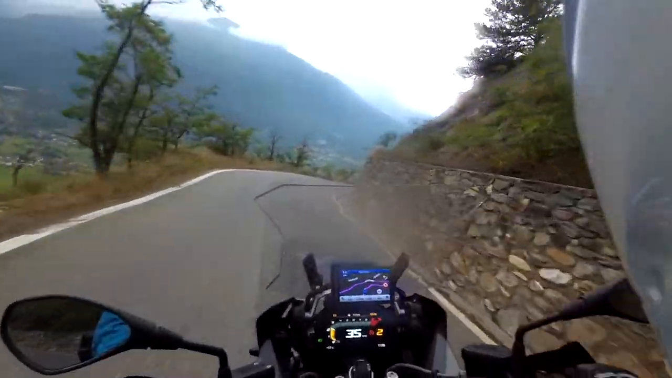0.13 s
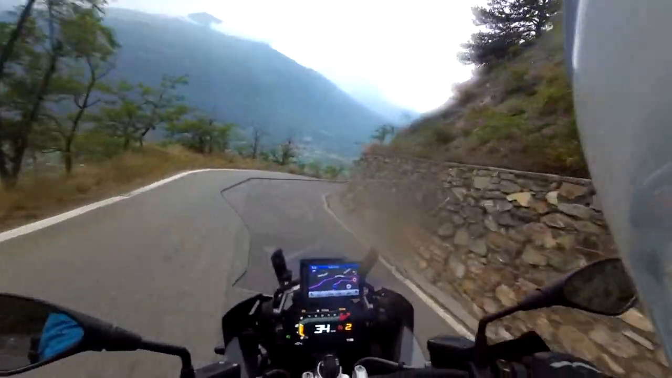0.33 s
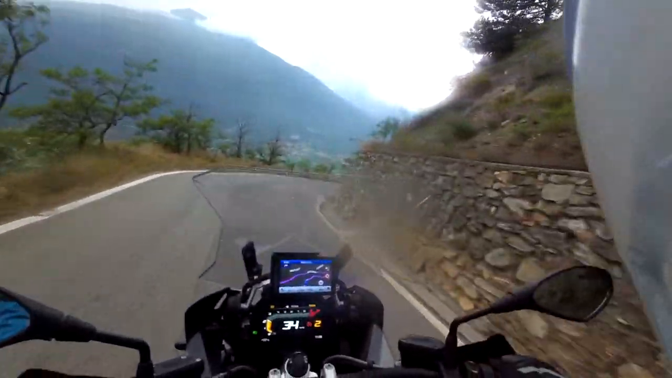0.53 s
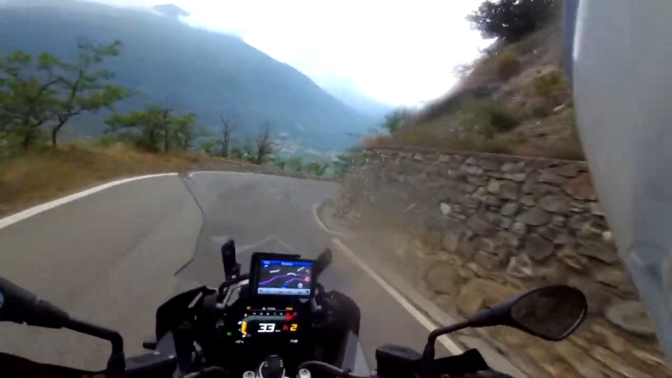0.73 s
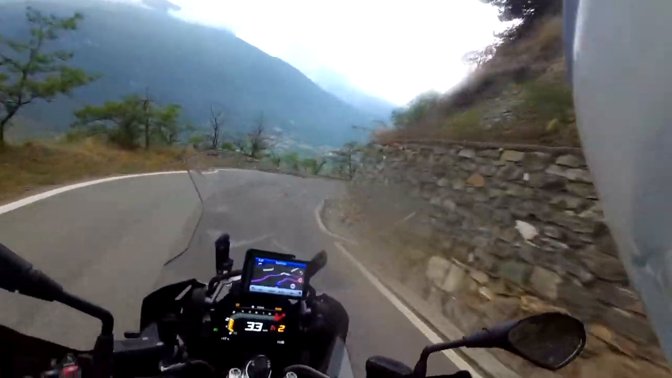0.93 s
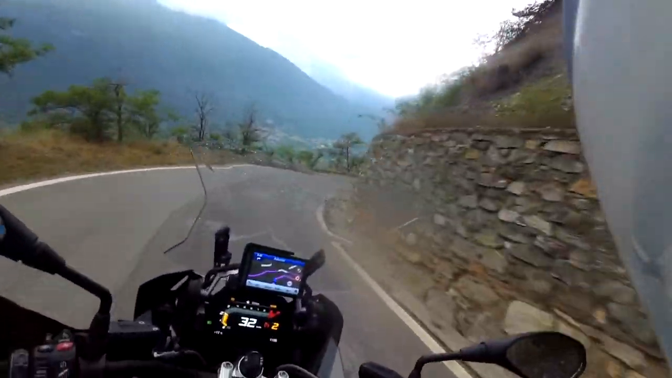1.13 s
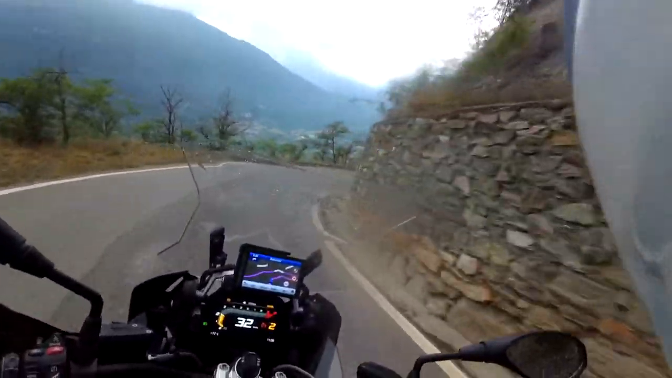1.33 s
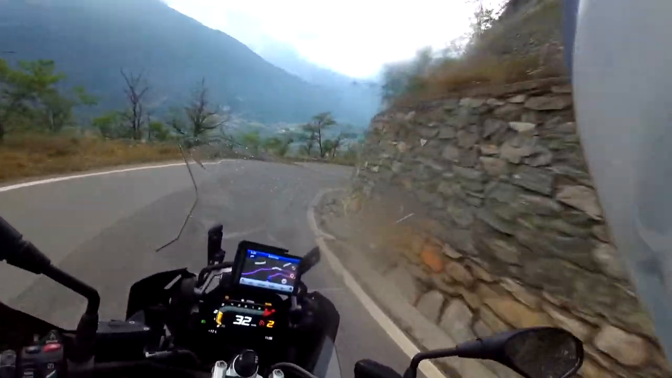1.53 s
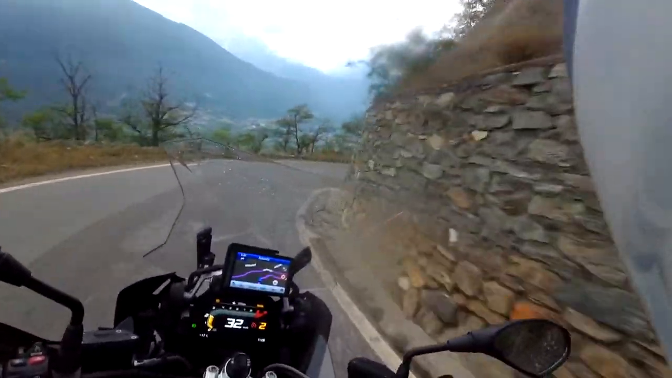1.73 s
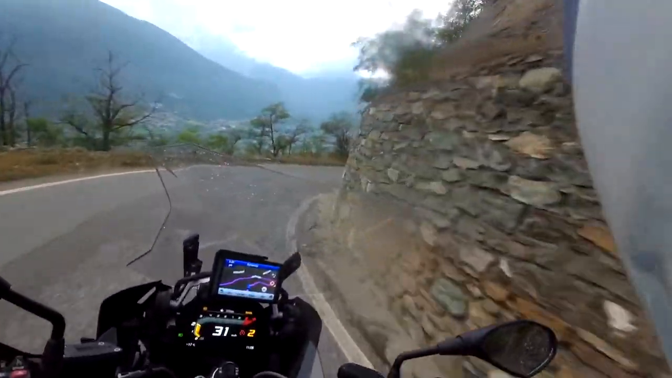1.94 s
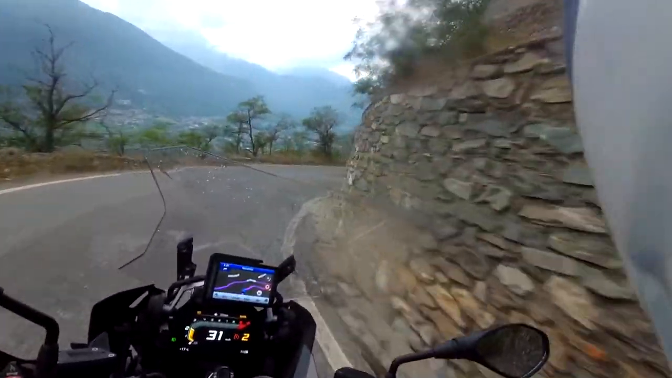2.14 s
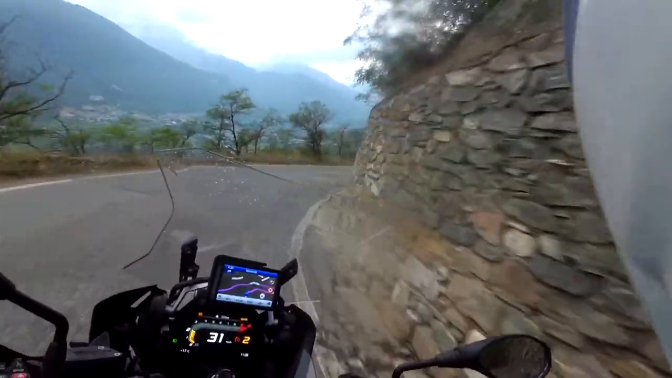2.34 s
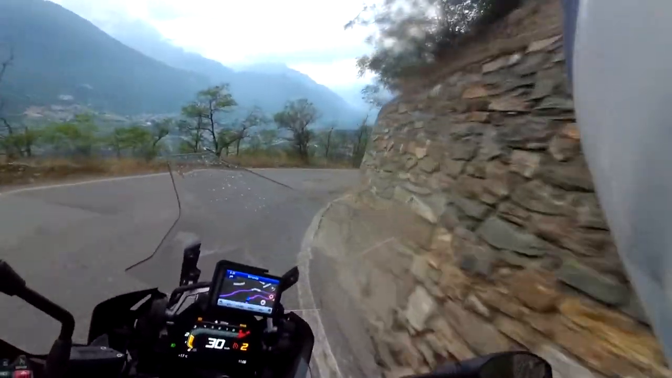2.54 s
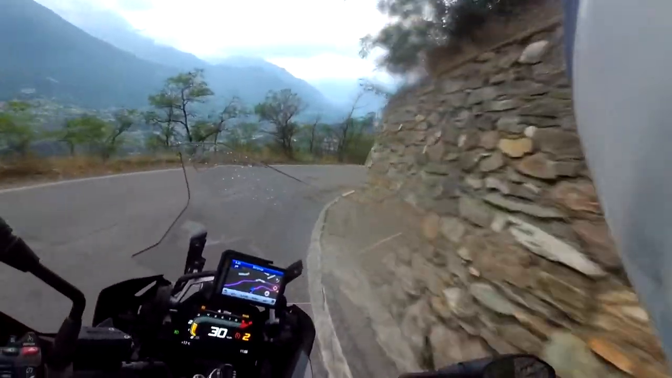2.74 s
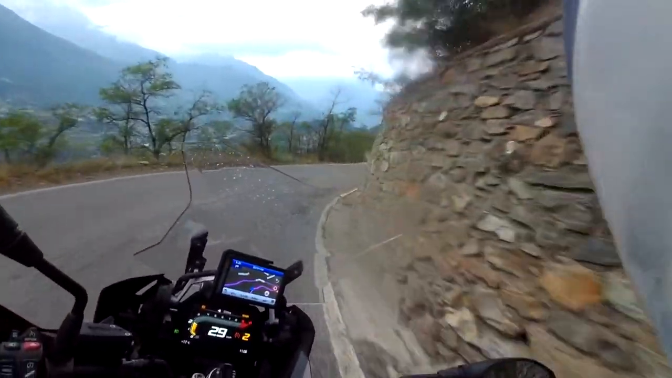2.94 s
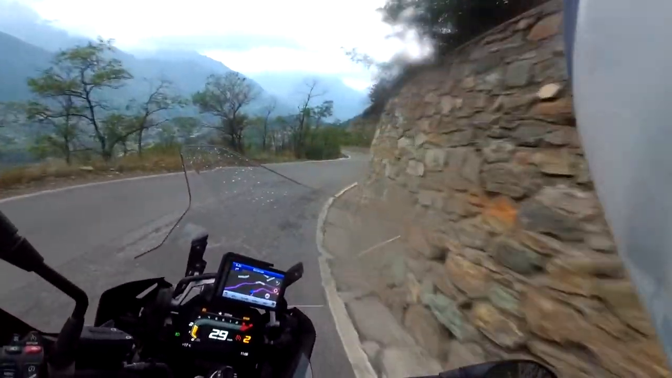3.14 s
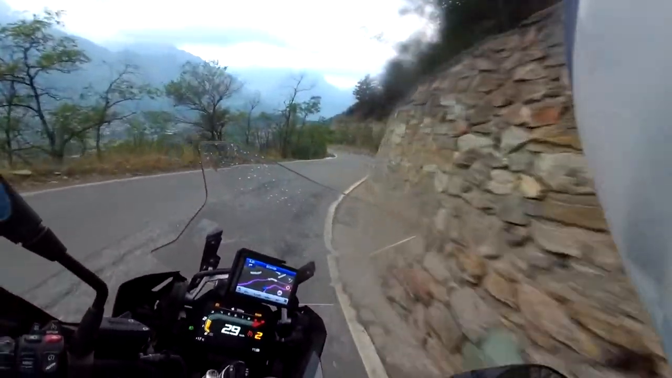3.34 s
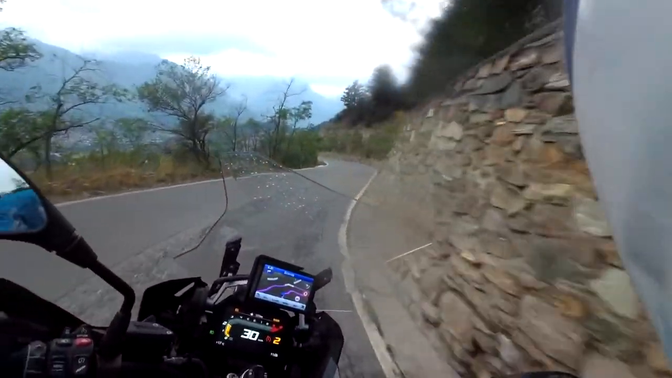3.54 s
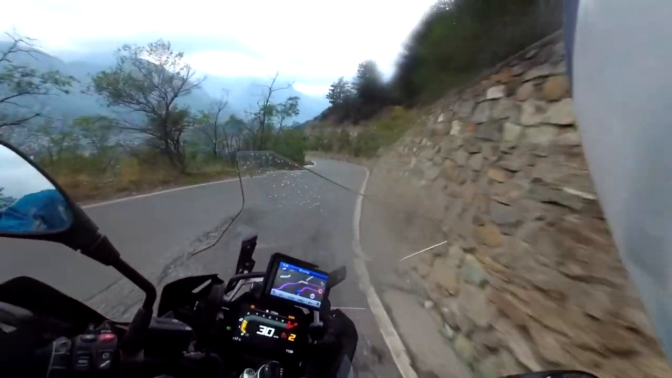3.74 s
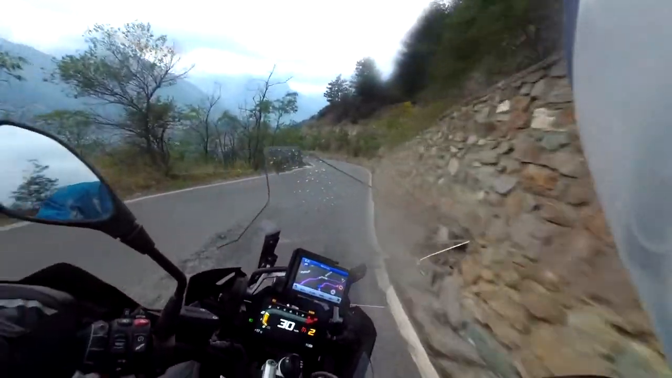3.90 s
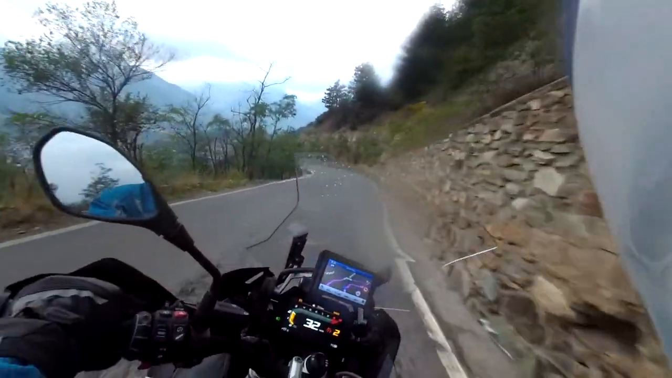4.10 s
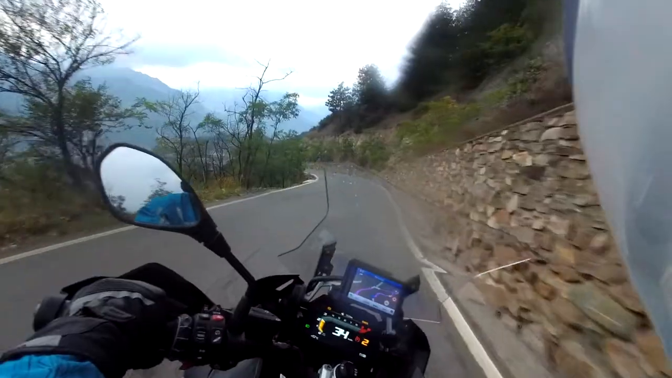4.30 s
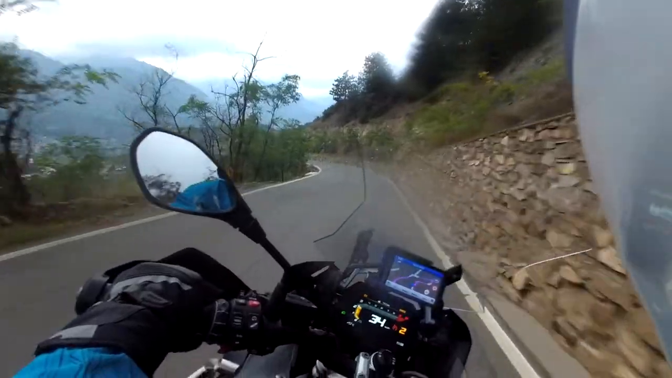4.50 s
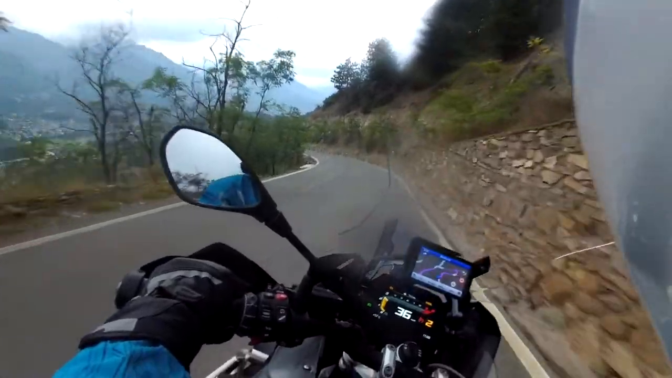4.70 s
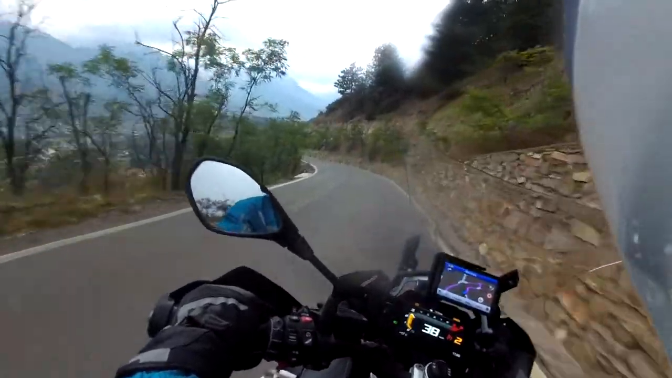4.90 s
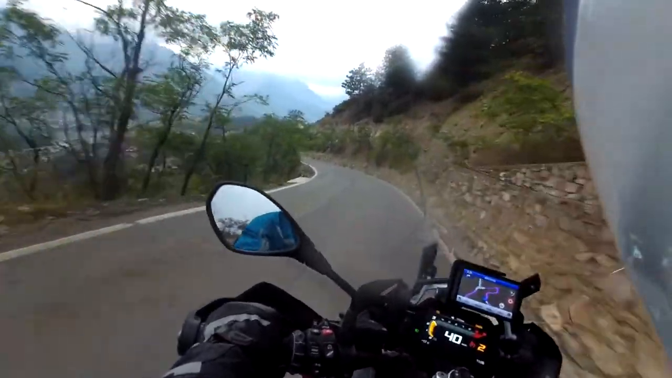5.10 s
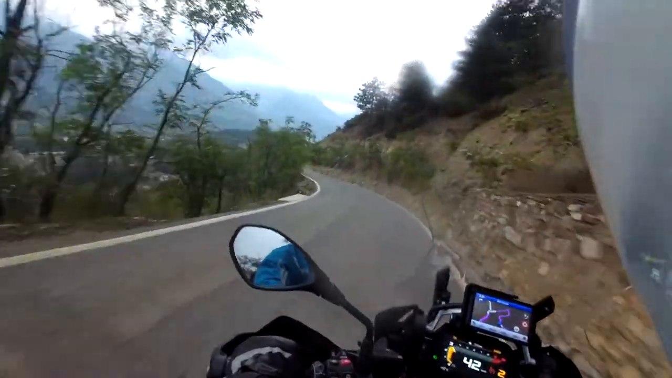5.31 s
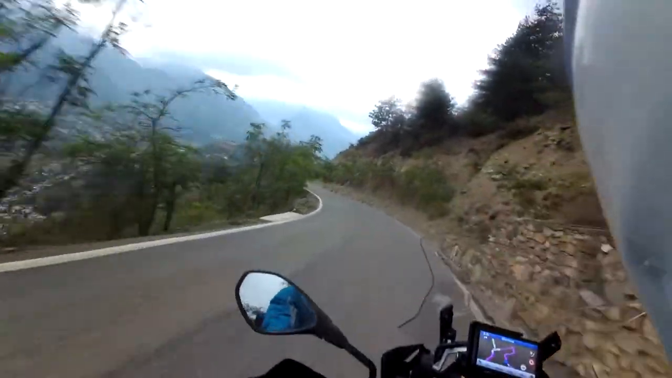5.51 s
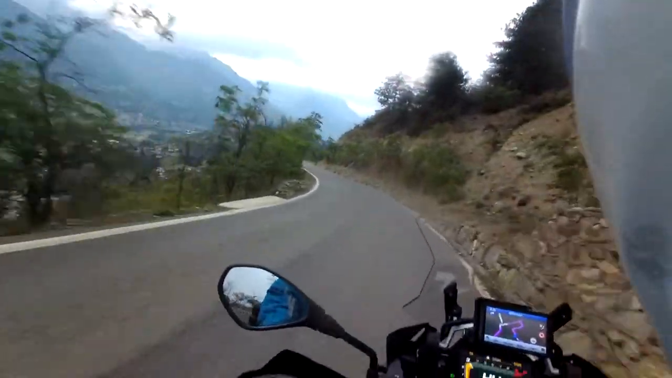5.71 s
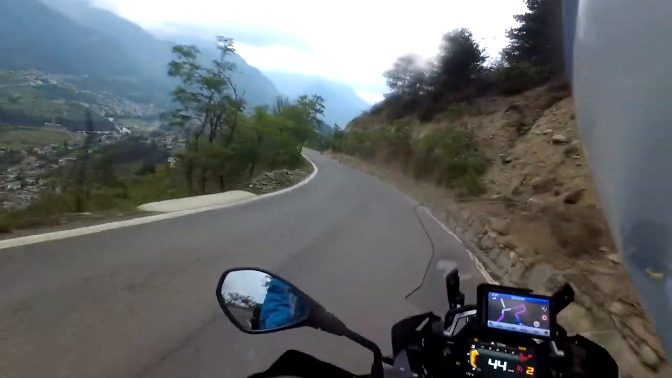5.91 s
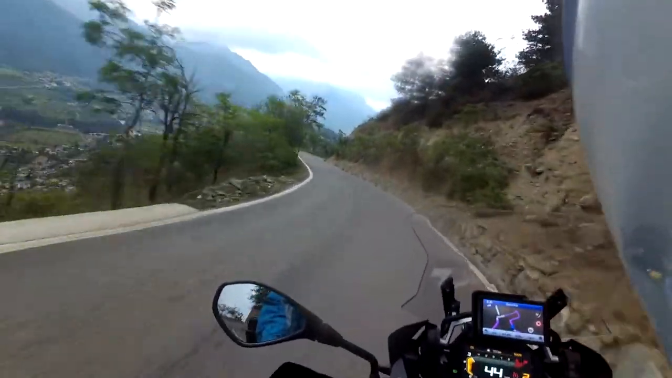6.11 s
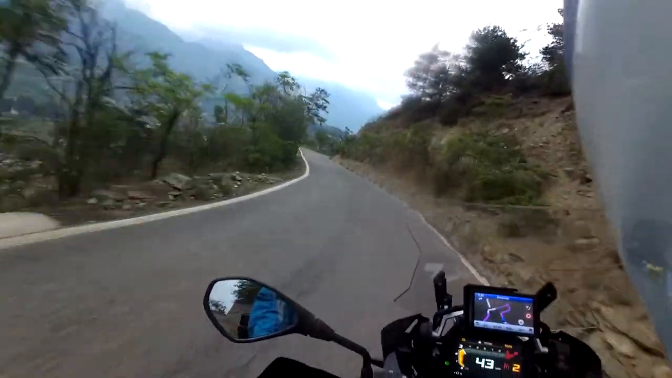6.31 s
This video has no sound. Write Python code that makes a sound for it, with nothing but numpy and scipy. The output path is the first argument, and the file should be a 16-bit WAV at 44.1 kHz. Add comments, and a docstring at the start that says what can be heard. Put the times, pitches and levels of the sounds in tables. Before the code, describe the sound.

A motorcycle engine runs throughout, captured on board at the helmet, dry and nearly mono. It begins at modest revs, slowing gradually with soft tapping and gear whine, then burbles and pops on a shut throttle. At mid-clip it picks up, its beat thickening into a strong, raspy pull as pitch climbs. Near the end the throttle is briefly eased, low knocks sound, wind gusts, and the revs hold fairly steady.

```python
"""Twin-cylinder motorcycle through a bend

Heard from the rider's helmet: the bike rolls off, pops on the closed throttle, pulls away and levels out.
The exhaust beat is a stack of engine orders shaped by the pipe, with rasp, burble and booming pops on top.
Metal comes from noise throbbing with the firing, wavering gear and casing tones, and dry noise bursts.
Shaped noise gives the rush of air and tyres, the lumpy buffeting at the helmet and the fine hiss."""
import sys
import numpy as np
from scipy import signal
from scipy.fft import rfft, irfft
from scipy.io import wavfile
from scipy.ndimage import uniform_filter1d

SR = 44100
rng = np.random.default_rng(int(sys.argv[2]) if len(sys.argv) > 2 else 0)


def to_wav(sig):
    """Store sig (one row per channel, or 1-D mono) as 16-bit WAV at the path in sys.argv[1].

    Samples outside -1..1 are clipped; the rate is SR.
    """
    pcm = np.clip(np.atleast_2d(sig), -1, 1) * 32767
    pcm = np.round(pcm).astype(np.int16)
    wavfile.write(sys.argv[1], SR, pcm.T)  # frames by channels


N = 280035
TIME = np.arange(N) / SR  # s
EDGE_HZ = 15350  # top of the audible band
CRUISE_HZ = 40  # cycle rate at which the speed-driven levels hold their base value
FIRING_GAP = 270 / 720  # engine cycles between the two cylinders' firing

# Engine speed, and with it road speed, as the bike stays in one gear: [t/s, four-stroke cycle rate f/Hz]
SPEED = [(0.0, 39.5), (0.21, 38.8), (0.34, 39.3), (0.9, 37.2), (1.86, 36.4), (2.37, 34.1), (2.42, 34.9),
         (3.09, 34.2), (3.7, 36.0), (3.87, 39.3), (4.0, 37.9), (4.23, 39.5), (4.95, 47.4), (5.39, 51.6),
         (5.53, 49.4), (5.82, 51.3), (5.98, 49.5), (6.35, 50.1)]
# Throttle, eased, shut in the bend, opened, eased for a moment and held: [t/s, opening 0-1]
THROTTLE = [(0, 0.21), (1, 0.19), (2.1, .16), (2.35, 0.11), (3.4, 0), (3.8, .05), (4.15, .38), (4.6, 0.81),
            (5.0, 0.99), (5.35, 0.87), (5.54, .42), (5.72, 0.7), (6.35, 0.54)]
# The engine takes up the load on the way out of the bend: [start t/s, end t/s]
TAKE_UP = (3.52, 3.97)
# A jolt over a rough patch lifts rush, clatter and hiss: [t/s, half length/s, level/dB]
JOLT = (3.85, 0.048, 1.5)

# Small loose parts tick: [t/s, relative level/dB]
TICKS = [(3.8402, -47), (3.8666, -48.5), (3.9265, -53)]
# Spectrum of the ticks: [f/Hz, relative level/dB]
TICK_COLOUR = [(1500, -22.5), (3500, -5), (5000, -4), (7000, -1), (9000, -1), (12000, -4), (15000, -5)]
# The driveline knocks as the load changes: [t/s, relative level/dB]
KNOCKS = [(3.519, -46), (4.038, -45), (5.396, -32.5), (5.539, -30), (5.549, -29.5), (5.566, -45),
          (5.594, -33), (5.629, -30), (5.660, -29), (5.766, -32), (5.880, -35), (6.262, -41)]
# Spectrum of the knocks: [f/Hz, relative level/dB]
KNOCK_COLOUR = [(200, 8.5), (330, 7.5), (480, -3), (600, 8), (800, -10), (1300, -14), (2500, -29)]

# Spectrum of the air hiss: [f/Hz, relative level/dB]
HISS = [(3000, -6), (4100, -6), (5000, -0.5), (5600, -3), (6800, -0.5), (7800, -4.5), (9400, -4),
        (10500, 3.5), (11500, -0.5), (12800, -5), (14300, 2), (15500, -4)]
# Spectrum of the eddies round the helmet: [f/Hz, relative level/dB]
BUFFET = [(20, -36), (45, -21), (70, -8), (110, 3), (170, 0.5), (260, -1), (340, -14.5), (500, -45)]
# The wall in the bend shelters the helmet from the wind: [start t/s, end t/s, edge/s, level/dB]
LEE = (1.84, 3, 0.26, -14)
# A gust at the helmet: [t/s, half length/s, level/dB]
GUST = (5.6, 0.104, 8)
# Spectra of the rush at low and at high speed: [f/Hz, relative level/dB]
RUSH_SLOW = [(270, -6.5), (335, -7), (375, -9.5), (425, -1), (510, -8), (590, -3), (720, -8.5), (795, -6),
             (860, -11), (990, -15.5), (1170, -12), (1440, -21), (1700, -26), (2200, -51)]
RUSH_FAST = [(180, -27), (300, -5), (431, 0.5), (528, -9), (585, -2), (634, -9.5), (788, -5.5), (944, -15),
             (1030, -11.5), (1490, -16), (1700, -30), (2210, -61), (3740, -120)]

# The airbox and casings ring under load: [f/Hz, width/Hz, level at full throttle/dB]
CASING = [(591, 27, -56), (1507, 50, -61), (2950, 170, -66.5)]
TAP_START = 0.929  # s, the moment the taps are counted from
# Spectrum of the light mechanical tap: [f/Hz, relative level/dB]
TAP_COLOUR = [(700, -12), (1300, -4), (2150, 9), (2700, -28), (3500, -5), (4100, -25)]
# The tap stands out while the bike rolls off: [t/s, half length/s, level/dB]
TAP_SWELL = (1.18, .6, 7.2)
# Gear whine: [multiple of the cycle rate, width/Hz, relative level/dB, change at full throttle/dB]
GEARS = [(59.4, 14, 0, -11.5), (60, 140, -7, 8), (58.2, 27, -12, 6), (62.5, 32, -13.5, 9),
         (28.6, 25, -3, -9)]
# Gear teeth run slack between engine braking and drive: [start t/s, end t/s, edge/s, level/dB]
SLACK = (2, 3, 0.2, -13.5)
# Spectrum of the valve and piston clatter: [f/Hz, relative level/dB]
CLATTER = [(900, -8.5), (1400, -7.5), (1600, 0), (1800, -3), (2130, -0.5), (2550, -5.5), (2950, -2.5),
           (3280, -9), (3490, -3), (3620, -9), (3800, -11.5), (4100, -27.5), (4550, -12.5), (5300, -24.5)]

# Spectrum of the gas tumbling in the silencer: [f/Hz, relative level/dB]
BURBLE = [(95, -27), (125, 1.5), (165, 4), (195, -1.5), (250, 2), (280, -1.5), (315, -21.5)]
# Unburnt fuel pops in the exhaust: [t/s, relative peak level/dB]
POPS = [(2.357, -20.5), (2.414, -18), (2.442, -18.5), (2.590, -18.5), (2.619, -19.5), (2.765, -15),
        (2.967, -24.5), (3.024, -27), (3.198, -21.5)]
# Silencer modes that colour each pop: [f/Hz, relative level/dB, swell time/s]
SILENCER = [(131.4, 1, 0.0095), (157, -13, 0.019), (246.5, -8.5, 0.0109)]
# Spectrum of the rasp: [f/Hz, relative level/dB]
RASP = [(36, -27), (50, 8.5), (70, -28), (280, -28), (345, 2.5), (410, 0.5), (500, -3), (600, -4),
        (900, -9.5), (1400, -20)]
# Peaks and notches of the pipe that the orders slide through: [f/Hz, relative level/dB]
PIPE_COASTING = [(70, -50), (76, -41), (102, -48), (108.5, -39.5), (112, -47), (118, -53), (140, -42.5),
                 (148, -52), (184, -70.5), (214, -48), (232, -57), (243, -48), (280, -66)]
PIPE_PULLING = [(79, -46.5), (101, -26.5), (130, -25), (141, -30.5), (149, -39), (163, -41.5), (177, -51),
                (195, -37), (236, -37.5), (268, -39.5), (295, -47.5), (355, -55)]
# Exhaust orders under load, odd and high ones weak until the throttle opens wide:
# [multiple of the cycle rate, relative level/dB, gain at full throttle/dB]
ORDERS_PULLING = [(2, 0, 1.5), (3, -18, 22), (4, 0, 2.5), (5, -16, 20), (6, -12, 10.5), (7, -14.5, 18),
                  (8, -13, 19)]
# The exhaust note falters as the throttle is eased: [t/s, half length/s, depth 0-1]
FALTER = [(5.54, .05, .35), (5.627, 0.014, .9)]

# Phase between the microphone ports: [f/Hz, lead of the left/rad]
PORT_PHASE = [(20, 1.5), (45, 1.45), (80, 1.1), (130, .74), (270, .38), (550, .16), (1100, .03), (3000, 0)]
# Balance between the microphone ports: [f/Hz, left minus right level/dB]
PORT_BALANCE = [(30, -4), (75, -2.5), (105, 0.1), (200, 0.1), (1000, 0)]


def amp(db):
    """Decibels to gain."""
    return 10 ** (np.asarray(db) / 20)


def unit(x):
    """Scales to rms 1."""
    return x / np.sqrt(np.mean(abs(x) ** 2) + 1e-20)


def curve(rows):
    """The second column of a table, joined by straight lines in time."""
    s, values = np.transpose(rows)
    return np.interp(TIME, s, values)


def swell(s, half_length, height):
    """A smooth rise and fall around a given time."""
    return height * np.exp(-((TIME - s) / half_length) ** 2)


def spell(start, end, edge, height):
    """A plateau with soft edges."""
    return height * (np.tanh((TIME - start) / edge) - np.tanh((TIME - end) / edge)) / 2


def effort_db(speed, pull, base_db, octave_db, pull_db):
    """A level that grows with each doubling of speed and shifts under load."""
    return base_db + octave_db * np.log2(speed / CRUISE_HZ) + pull_db * pull


def colour(points, hz):
    """The gain of a spectrum at given frequencies."""
    f, db = np.transpose(points)
    return amp(np.interp(np.log(hz + 1), np.log(f + 1), db))


def noise(points):
    """Noise of rms 1 with a given spectrum, falling off beyond its ends."""
    hz = np.fft.rfftfreq(N, 1 / SR)
    low_skirt = np.minimum(hz / points[0][0], 1) ** 2
    high_skirt = np.maximum(hz / points[-1][0], 1) ** -2
    white = rfft(rng.standard_normal(N))
    return unit(irfft(white * colour(points, hz) * low_skirt * high_skirt, N))


def wander(rate_hz):
    """Smooth random drift of rms 1, fading out above a given rate."""
    hz = np.fft.rfftfreq(N, 1 / SR)
    return unit(irfft(rfft(rng.standard_normal(N)) * np.exp(-(hz / rate_hz) ** 2), N))


def fuzzy_line(turns, width):
    """A tone of rms 1 whose level and phase waver, which widens its line."""
    fuzz = unit(wander(width) + 1j * wander(width))
    return np.sqrt(2) * (fuzz * np.exp(2j * np.pi * turns)).real


def add(mix, s, sound):
    """Mixes a sound in at a given time."""
    part = mix[max(round(s * SR), 0):][:len(sound)]
    part += sound[:len(part)]


def bursts(rows, spectrum, decay_s, level_db):
    """Short dry blows: coloured noise that starts at once and dies fast."""
    t = np.arange(SR // 20) / SR
    envelope = np.zeros(N)
    for s, db in rows:
        add(envelope, s, amp(db + level_db) * np.exp(-t / decay_s))
    return uniform_filter1d(envelope, size=24) * noise(spectrum)


def strokes(turns, decay=0.37, second=0.38, uneven=0.13):
    """Two unequal blows decaying in each engine cycle, as a swing of rms 1 around zero."""
    later = turns - FIRING_GAP
    blows = np.exp(-(turns % 1) / decay) + second * np.exp(-(later % 1) / decay)
    blows = uniform_filter1d(blows * (1 + uneven * wander(40)), size=40)
    return unit(blows - blows.mean())


def ticks():
    """Loose parts strike once each: very short bright bursts."""
    return bursts(TICKS, TICK_COLOUR, decay_s=0.004, level_db=-6)


def knocks():
    """Driveline play is taken up with a blow: short low bursts."""
    return bursts(KNOCKS, KNOCK_COLOUR, decay_s=0.0063, level_db=1.5)


def hiss(beat, db, beat_db=0.5, gust_db=0.5):
    """Fine turbulence of the passing air: bright noise, slightly gusty and throbbing."""
    return unit(noise(HISS) * amp(beat_db * beat + gust_db * wander(25))) * amp(db)


def buffet(speed, gust_db=-0.5):
    """Lumpy low eddies around the helmet, growing with speed, sheltered in the bend and lifted by a gust."""
    db = effort_db(speed, 0, base_db=-42.5, octave_db=19, pull_db=0) + spell(*LEE) + swell(*GUST)
    return unit(noise(BUFFET) * amp(gust_db * wander(19))) * amp(db)


def rush(beat, db, speed, slow_hz=35, fast_hz=51, beat_db=1.0, gust_db=1.0):
    """Air, tyres and intake: a roar that throbs a little with the engine and changes colour with speed."""
    fast = np.clip((speed - slow_hz) / (fast_hz - slow_hz), 0, 1)
    roar = np.sqrt(1 - fast) * noise(RUSH_SLOW) + np.sqrt(fast) * noise(RUSH_FAST)
    return unit(roar * amp(beat_db * beat + gust_db * wander(22))) * amp(db)


def casing(throttle):
    """Fixed resonances that hard combustion wakes, in proportion to throttle."""
    ringing = sum(amp(db) * fuzzy_line(hz * TIME, width) for hz, width, db in CASING)
    return throttle * ringing


def taps(turns):
    """A light mechanical tap once in every two engine cycles, clearest while rolling off."""
    laps = np.floor((turns - np.interp(TAP_START, TIME, turns)) / 2)
    at = np.flatnonzero(np.diff(laps))
    return bursts(zip(TIME[at], swell(*TAP_SWELL)[at]), TAP_COLOUR, decay_s=0.0051, level_db=-60)


def gears(turns, speed, beat, throttle, pull, level_db=-66, pull_db=-6, beat_db=1.0,
          ring_hz=2970, ring_width_hz=150, ring_db=14):
    """Meshing teeth give lines that follow engine speed, fade when slack and flare through a resonance."""
    lines = np.zeros(N)
    for teeth, width, db, load_db in GEARS:
        nearness = np.exp(-((teeth * speed - ring_hz) / ring_width_hz) ** 2)
        flare_db = ring_db * throttle ** 2 * nearness
        lines += amp(db + load_db * throttle + flare_db) * fuzzy_line(teeth * turns, width)
    return lines * amp(level_db + pull_db * pull + spell(*SLACK) + beat_db * beat)


def clatter(beat, db, beat_db=1.58):
    """Valves and pistons rattle the casings: noise that throbs in step with the firing."""
    return unit(noise(CLATTER) * amp(beat_db * beat)) * amp(db)


def burble(throttle, level_db=-43.5, closing=0.19):
    """Gas tumbles in the silencer: low noise that rises as the throttle shuts."""
    return amp(level_db) * np.exp(-throttle / closing) * noise(BURBLE)


def pops(level_db=-1.0):
    """Each pop swells and dies in the silencer modes within a few cycles."""
    t = np.arange(SR // 20) / SR
    boom = np.zeros(len(t))
    for hz, db, swell_s in SILENCER:
        envelope = t / swell_s * np.exp(-0.5 * (t / swell_s) ** 2)
        boom -= amp(db) * envelope * np.cos(2 * np.pi * hz * t)
    boom /= abs(boom).max()
    out = np.zeros(N)
    for s, db in POPS:
        add(out, s, amp(db + level_db) * boom)
    return out


def rasp(turns, speed, rough=0.25, count=28):
    """Pulse trains of two cylinders firing 270 crank degrees apart, each uneven, louder with speed."""
    out = np.zeros(N)
    for offset in (0, FIRING_GAP):
        pulses = np.zeros(N)
        for k in range(1, count):
            pulses += colour(RASP, k * speed) * np.cos(2 * np.pi * k * (turns - offset))
        out += pulses * (1 + rough * wander(30))
    return unit(out) * amp(effort_db(speed, 0, base_db=-57, octave_db=24, pull_db=0))


def exhaust(turns, speed, throttle, pull, pipe_hz=140, coast_q=0.61, load_q=4.6, second=1.42,
            bite=0.2425, coast_open_db=28, unsteady=0.026, flutter=0.094, misfire=0.12,
            skip=0.41, skip_s=0.011):
    """Low orders of two unevenly spaced firing pulses, coloured by the pipe and delayed by its resonance."""
    out = np.zeros(N)
    ragged = flutter + misfire * np.exp(-throttle / 0.035)  # combustion is uneven on a closed throttle
    # coasting gives one short chug a cycle; under load both pulses ring on into a drone
    load = np.clip(2 * throttle / bite - 1, 0, 1) ** 2
    for order, pull_db, open_db in ORDERS_PULLING:
        k = round(order)
        coasting = colour(PIPE_COASTING, k * speed) * amp(coast_open_db * throttle)
        pulling = colour(PIPE_PULLING, k * speed) * amp(pull_db + open_db * throttle)
        level = coasting ** (1 - pull) * pulling ** pull
        pair = load * np.angle(1 + second * np.exp(-2j * np.pi * k * FIRING_GAP))
        ratio = k * speed / pipe_hz
        lag = 2 * np.arctan((coast_q + load_q * load) * (ratio - 1 / ratio))
        sway = 1 + ragged * (wander(19.5) + 1j * wander(18))
        out += level * (sway * np.exp(1j * (2 * np.pi * k * turns + pair - lag))).real
    gaps = sum(swell(*row) for row in FALTER)
    gaps = gaps + sum(swell(s, skip_s, skip) for s, db in POPS)  # each pop takes the place of a beat
    return np.sqrt(2) * out * np.clip(1 - gaps, 0, 1) * (1 + unsteady * wander(25))


def ports(x):
    """Two microphone ports that roll off the bass differently, which shifts its phase and level."""
    hz = np.fft.rfftfreq(N, 1 / SR)
    f, radians = np.transpose(PORT_PHASE)
    side = 1j * np.tan(np.interp(np.log(hz + 1), np.log(f), radians) / 2)
    lean = np.sqrt(colour(PORT_BALANCE, hz))
    return irfft(rfft(x) * np.array([(1 + side) * lean, (1 - side) / lean]), N)


def scene():
    """Everything rides with the bike, so the sound is nearly the same at both microphone ports."""
    speed = curve(SPEED)
    throttle = np.clip(curve(THROTTLE), 0, 1)
    pull = np.interp(TIME, TAKE_UP, [0, 1])
    turns = np.cumsum(speed * (1 + 0.00301 * wander(20.55))) / SR  # engine cycles, slightly unsteady
    beat = strokes(turns)

    jolt_db = swell(*JOLT)
    hiss_db = effort_db(speed, pull, base_db=-68.5, octave_db=4, pull_db=2.5) + jolt_db
    rush_db = effort_db(speed, pull, base_db=-45.94, octave_db=13.5, pull_db=-0.37) + jolt_db
    clatter_db = effort_db(speed, pull, base_db=-59.2, octave_db=7.5, pull_db=1.55) + jolt_db

    air = hiss(beat, hiss_db) + buffet(speed) + rush(beat, rush_db, speed)
    metal = casing(throttle) + taps(turns) + gears(turns, speed, beat, throttle, pull)
    metal += clatter(beat, clatter_db) + ticks() + knocks()
    pipe = burble(throttle) + pops() + rasp(turns, speed) + exhaust(turns, speed, throttle, pull)

    sound = (air + metal + pipe) * signal.windows.tukey(N, 400 / N)  # short fades at both ends
    width = amp(-30.5) * hiss(beat, hiss_db)  # a faint hiss of opposite sign at the two ports
    return ports(sound) + np.array([width, -width])


def record(dry):
    """Cuts the treble above the band edge with a steep linear-phase filter."""
    kernel = signal.firwin(511, EDGE_HZ, window=("kaiser", 9), fs=SR)
    return signal.oaconvolve(dry, kernel[None], "same")


dry = scene()
out = record(dry)
to_wav(out)
```